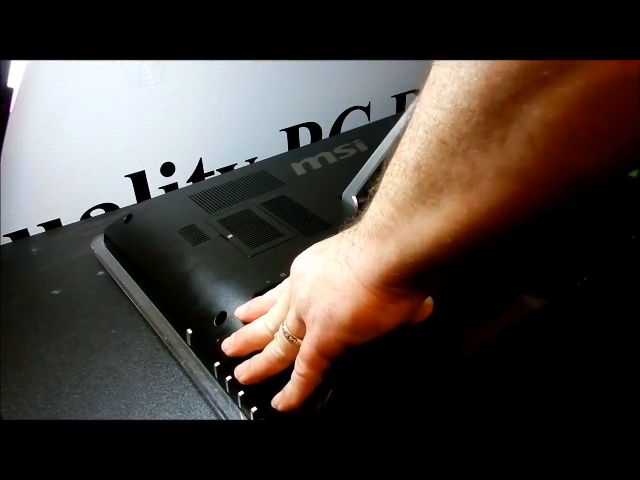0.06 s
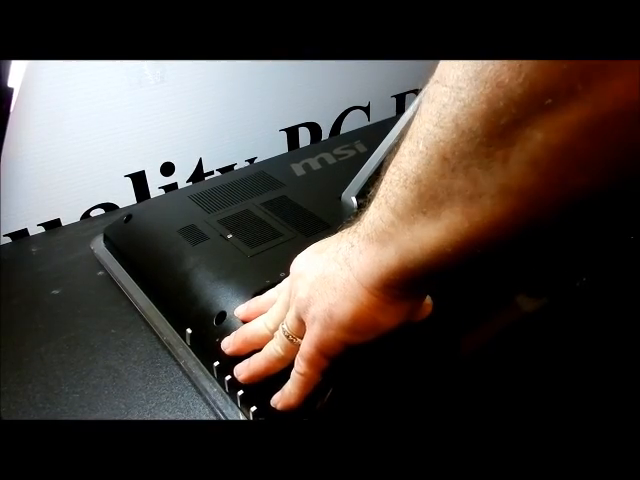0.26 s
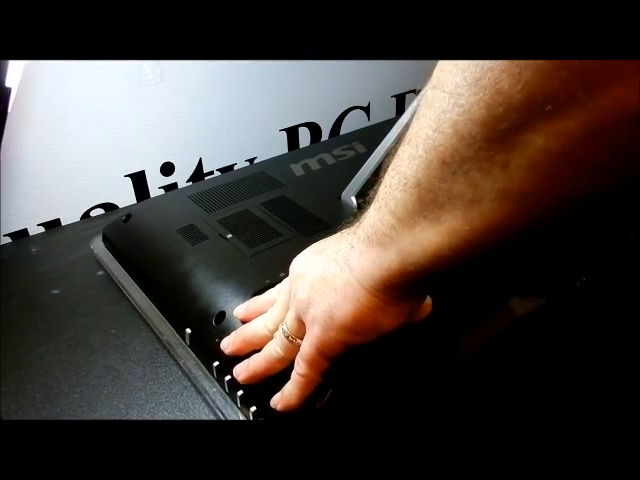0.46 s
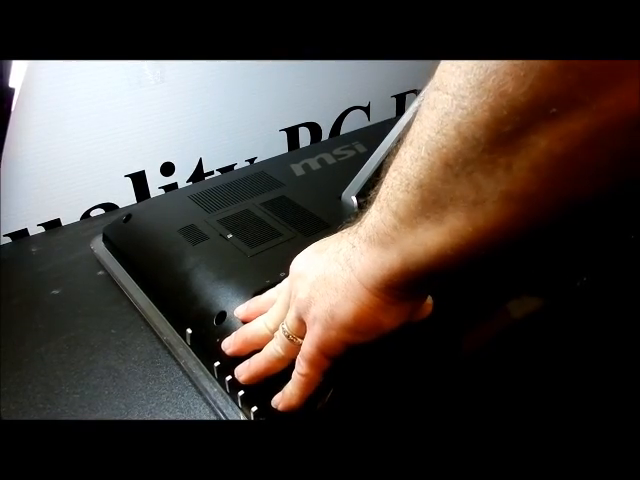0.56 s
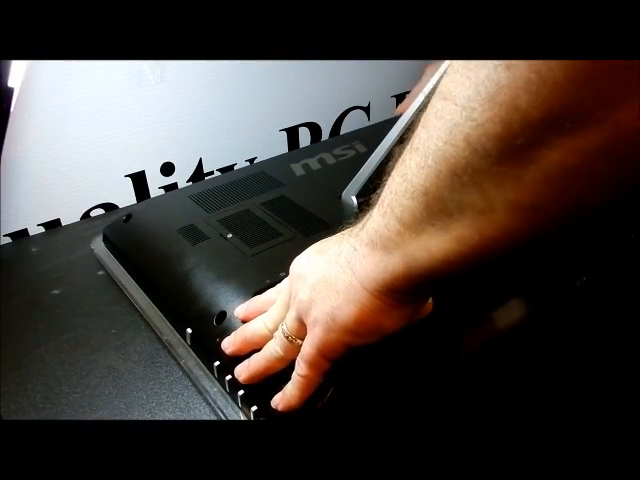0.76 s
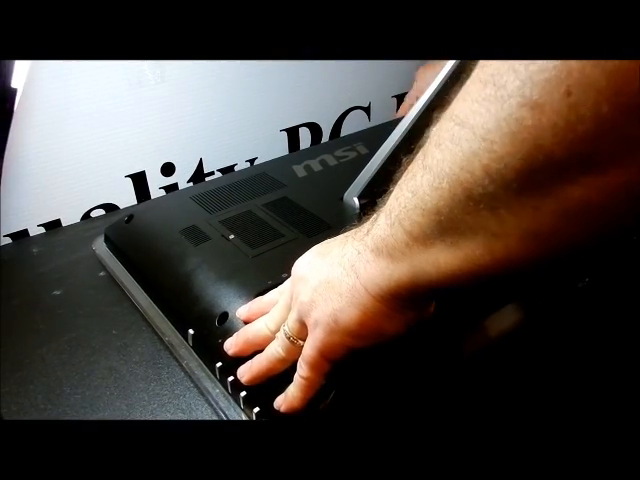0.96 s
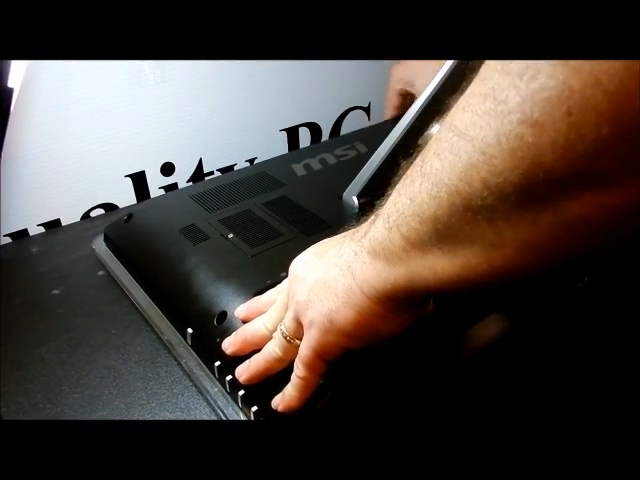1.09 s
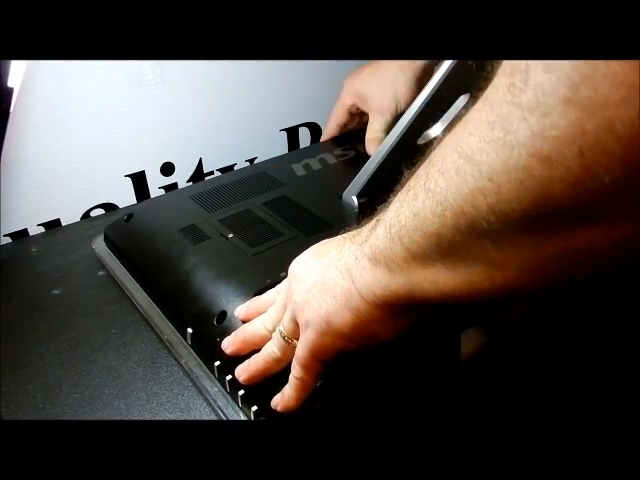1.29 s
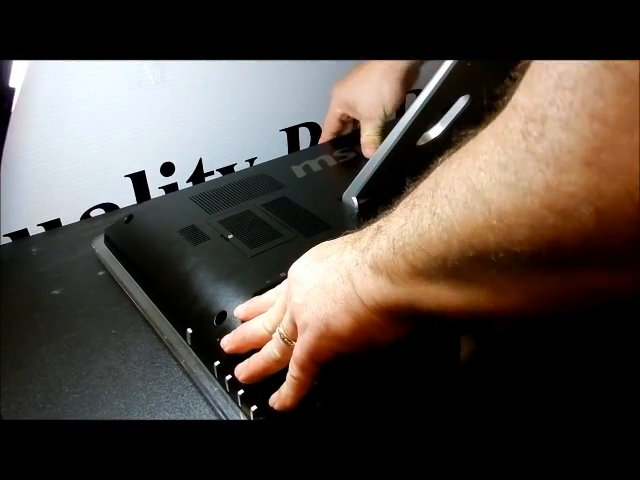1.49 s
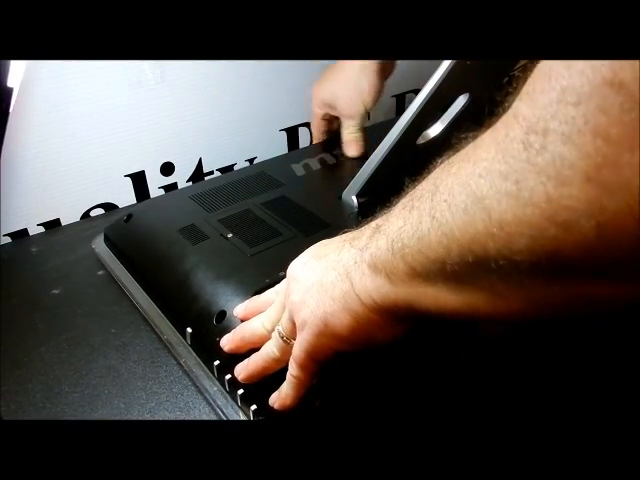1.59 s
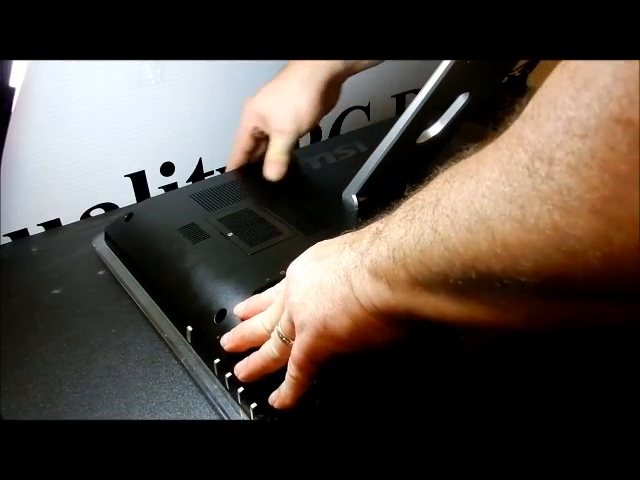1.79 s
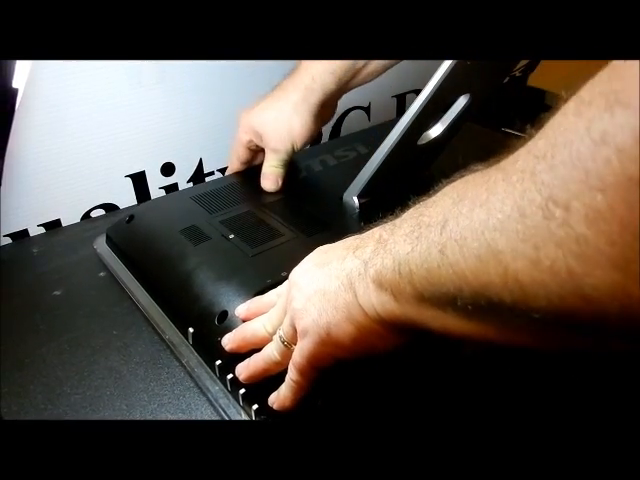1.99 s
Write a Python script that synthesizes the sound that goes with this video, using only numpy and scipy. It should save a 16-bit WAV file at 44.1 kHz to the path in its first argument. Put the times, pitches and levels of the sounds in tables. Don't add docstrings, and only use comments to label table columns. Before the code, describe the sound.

Plastic cover clips snapping home, close up in a small, slightly echoing room. Faint bumps lead to a sharp hollow crack at 0.23 s and a louder, brighter one at 0.41 s, with shell creaking between. It goes nearly quiet over low room hum, with a small knock at 0.81 s. From 1.2 s soft knocks, flexing and skin hiss continue, with a firmer thump at 1.74 s, until about 2 s.

```python
import sys
import numpy as np
from scipy import signal
from scipy.fft import rfft, irfft, next_fast_len
from scipy.io import wavfile
from scipy.ndimage import map_coordinates

SR = 44100
rng = np.random.default_rng(int(sys.argv[2]) if len(sys.argv) > 2 else 0)


def elevation(decibels):
    levels = np.asarray(decibels, float)
    return 10 ** (levels / 20)


def file_out(sig):
    cols = np.atleast_2d(sig).T
    lim = np.clip(cols, -1, 1)
    pcm = np.round(lim * 32767).astype(np.int16)
    wavfile.write(sys.argv[1], SR, pcm)


N = 90404

# pitch in Hz, level in dB, t60 in seconds.
SHELL = [(108, -15, 0.078), (157.9, -6.5, .13), (340, -7, 0.18), (404, -2, 0.18), (433.8, -2.5, 0.065),
         (544.2, 0.5, 0.067), (660, -20.5, 0.066), (775.4, -1.5, 0.086), (850, -13, 0.078),
         (943.5, 0, 0.15), (1150, -14, 0.094), (1492, -9, 0.12), (1833, -18, 0.073), (2500, -12, 0.075)]


def unit(x):
    return x / np.sqrt(np.mean(x ** 2) + 1e-20)


def along(points, hz):
    f, v = np.transpose(points)
    return np.interp(np.log(hz + 1), np.log(f + 1), v)


def curve(rows):
    s, v = np.transpose(rows)
    return np.interp(np.arange(N) / SR, s, v)


def wobble(rate):
    knots = rng.standard_normal(int(N * rate / SR) + 4)
    return map_coordinates(knots, [np.arange(N) * rate / SR])


def filtered(x, response):
    m = next_fast_len(x.shape[-1] + SR // 2)
    spectrum = rfft(x, m) * response(np.fft.rfftfreq(m, 1 / SR))
    return irfft(spectrum, m)[..., :x.shape[-1]]


def peak(f, hz, width):
    return 1j * f * width / (hz * hz - f * f + 1j * f * width)


def spread(two):
    # frequency in Hz, left-right likeness from 0 to 1.
    likeness = [(100, 0.86), (500, 0.86), (3000, 0.53), (12000, .3)]

    def mid_side(hz):
        turn = np.arccos(np.clip(along(likeness, hz), -1, 1)) / 2
        return np.array([np.cos(turn), np.sin(turn)])

    mid, side = filtered(two, mid_side)
    return np.array([mid + side, mid - side])


def pair(spectrum):
    noise = rng.standard_normal((2, N))
    return unit(spread(filtered(noise, lambda hz: elevation(along(spectrum, hz)))))


def shell(f, extra_db, cut_hz):
    body = elevation(-7.5) * peak(f, 700, 1500)
    for k, (hz, db, t60) in enumerate(SHELL):
        width = np.log(1000) / np.pi / t60
        body = body + (-1) ** k * elevation(db + extra_db[k]) * peak(f, hz, width)
    return body / (1 + 1j * f / cut_hz) ** 2


def room(x):
    # frequency in Hz, t60 in seconds.
    decay = [(100, 0.36), (500, 0.33), (2000, 0.29), (8000, 0.24), (15000, .15)]
    level_db, gap_s = -5, .004
    hz, t, z = signal.stft(rng.standard_normal((2, SR // 2)), SR, nperseg=256)
    fading = z * elevation(-60 * t / along(decay, hz)[:, None])
    tail = spread(signal.istft(fading, SR, nperseg=256)[1])
    late = np.pad(x, (round(gap_s * SR), 0))
    wet = signal.fftconvolve(late[None], tail / np.linalg.norm(tail[0]), axes=1)
    return elevation(level_db) * wet[:, :len(x)]


def quiet_room():
    # frequency in Hz, density in dB per Hz.
    air = [(15, -42), (25, 4.5), (471, 2), (1630, -3), (2710, -8.5), (3850, -29.5), (4180, -16.5),
           (4780, -13), (15600, -32)]
    return elevation(-69) * pair(air)


def bench():
    # time in seconds, boom level in dB.
    boom = [(0.0, -46.5), (0.04, -40), (0.2, -53.5), (0.26, -39), (0.39, -46.5), (0.42, -39), (0.75, -80.5),
            (0.85, -44), (0.98, -69), (1.24, -48), (1.27, -48.5), (1.32, -68), (1.54, -47), (1.61, -64),
            (1.65, -43.5), (1.94, -51.5), (1.98, -42.5), (2.05, -50.5)]
    # pitch in Hz, width in Hz, level in dB.
    top_modes = [(74.9, 19, -7), (108, 51, -4), (158.7, 30, -1.5)]
    lumps = rng.standard_normal((2, N)) * elevation(2.6 * wobble(30))

    def top(f):
        return sum((-1) ** k * elevation(db) * peak(f, hz, w) for k, (hz, w, db) in enumerate(top_modes))

    return unit(spread(filtered(lumps, top))) * elevation(curve(boom))


def hand():
    # time in seconds, level in dB.
    creep = [
        (0.0, -61.5),
        (0.22, -56.5),
        (0.39, -49),
        (0.59, -63.5),
        (0.75, -81.5),
        (1.04, -74.5),
        (1.2, -54.5),
        (1.38, -50.5),
        (1.53, -55.5),
        (2.05, -54),
    ]
    # time in seconds, level in dB.
    weight = [(0.0, -73), (0.26, -39), (0.39, -32), (0.46, -39), (0.6, -77), (0.66, -85.5), (0.87, -67.5),
              (1.0, -56.5), (1.39, -50), (1.53, -52), (1.68, -44.5), (1.9, -44.5), (2.05, -45)]
    # frequency in Hz, density in dB per Hz.
    skin = [(1290, -34), (2200, -6), (3370, -8), (5740, -4.5), (8450, -5), (10200, -4), (11300, -2),
            (15600, -6.5)]
    # start in seconds, length in seconds, level in dB.
    stroke_rows = [(0.671, 0.054, -71), (0.898, 0.057, -80.5), (0.983, 0.12, -65.5), (1.085, 0.072, -63),
                   (1.188, 0.11, -51.5), (1.287, 0.099, -74), (1.469, .07, -58), (1.664, 0.15, -54.5),
                   (1.739, 0.052, -45.5), (1.815, 0.081, -47.5), (1.872, 0.091, -46)]
    t = np.arange(N) / SR
    strokes = 0
    for s, length, db in stroke_rows:
        strokes = strokes + elevation(db) * np.sin(np.pi * np.clip((t - s) / length, 0, 1)) ** 0.94
    grain = elevation(1.5 * wobble(25) + 1.2 * wobble(150))
    hiss = pair(skin) * (elevation(curve(creep)) + strokes) * grain
    lumps = rng.standard_normal((2, N)) * elevation(4 * wobble(39) + 4.8 * wobble(200))
    stir = unit(spread(filtered(lumps, lambda f: shell(f, np.zeros(len(SHELL)), 800))))
    return hiss + stir * elevation(curve(weight))


def knocks():
    # start in
    # seconds, level in dB, favoured pitch in Hz, length of the push in seconds, hardness as contact cut-off in
    # Hz.
    knock_rows = [(.003, -37.5, 477, 0.0032, 590), (0.033, -35.5, 383, .012, 650),
                  (0.082, -34.5, 414, .01, 900), (0.233, -13, 1735, 0.0024, 3240),
                  (0.2484, -16.5, 451, .006, 880), (0.353, -30.5, 420, .012, 670),
                  (0.4118, -11, 1355, .004, 2500), (.423, -18.5, 521.4, .009, 1190),
                  (.585, -50, 400, .01, 700), (0.62, -62.5, 404, .01, 697),
                  (0.812, -29.5, 465.5, 0.004, 1880), (0.977, -75.5, 406, .01, 700),
                  (1.029, -38, 394.5, .008, 1800), (1.166, -40.5, 466, .008, 990),
                  (1.205, -34, 850, 0.018, 1430), (1.214, -28, 879, 0.015, 1200),
                  (1.22, -29, 1150, 0.0068, 1200), (1.245, -36.5, 1455, 0.016, 1500),
                  (1.226, -30, 609, 0.016, 900), (1.439, -29.5, 660, 0.0082, 1620),
                  (1.516, -27, 390, 0.0067, 480), (1.622, -30, 516, 0.0041, 1470),
                  (1.647, -35.5, 417, 0.012, 880), (1.728, -33.5, 648, 0.0037, 2000),
                  (1.741, -20, 510, 0.013, 1670), (1.756, -27, 560, 0.0033, 1040),
                  (1.79, -38.5, 420, 0.0073, 800), (1.858, -31, 383.7, 0.021, 804),
                  (1.906, -34, 340, 0.022, 576), (1.955, -42.5, 389, 0.018, 900),
                  (1.984, -27, 550, 0.0062, 1200), (2.028, -45.5, 408, .008, 700)]
    rise_s, scatter_db = .0008, 2
    favour_db, favour_q = 5.5, 2.65
    flex_db, flex_lasts, flex_drift = -4.5, 2.68, 0.051
    out = np.zeros((2, N + SR))
    t = np.arange(SR // 2) / SR
    for s, db, pitch, length, cut in knock_rows:
        force = rng.standard_normal(len(t)) * (1 - np.exp(-t / rise_s)) * np.exp(-t / length)
        extra = scatter_db * rng.standard_normal(len(SHELL))

        def struck(f):
            favoured = 1 + elevation(favour_db) * peak(f, pitch, pitch / favour_q)
            return shell(f, extra, cut) * favoured

        ring = filtered(force, struck)
        turns = np.cumsum(pitch * (1 + flex_drift * wobble(250)[:len(t)])) / SR
        bend = np.sin(np.pi * np.clip(t / (flex_lasts * length), 0, 1) ** 0.71)
        flex = np.sin(2 * np.pi * turns) * bend
        knock = elevation(db) * (ring / np.abs(ring).max() + elevation(flex_db) * flex)
        out[:, round(s * SR):][:, :len(t)] += knock + room(knock)
    return out[:, :N]


def cracks():
    # time of release in seconds, level in dB, centre in Hz, t60 in seconds,
    # slip before it in dB.
    crack_rows = [(.2336, -19.5, 7400, 0.091, -13), (0.2347, -12.5, 2444, 0.033, -13.5),
                  (.4127, -8, 8500, 0.043, -19), (.811, -60, 2950, 0.013, -40),
                  (1.027, -48.5, 4500, .03, -10.5), (1.434, -49, 10000, 0.0086, -16.5),
                  (1.4526, -39.5, 6000, 0.024, -11), (1.4896, -33.5, 11630, .012, -24.5),
                  (1.673, -75.5, 8000, 0.022, -30), (1.74, -35, 7000, 0.1, -12.5),
                  (2.045, -41, 2500, .03, -14)]
    q, q_low = 0.65, .9
    spike_db, spike_t60 = 4.5, 0.0071
    slip_s, rise_s, side_gain = 0.029, 0.00039, .5
    lead = SR // 20
    out = np.zeros((2, N + SR))
    t = (np.arange(SR // 2) - lead) / SR
    for s, db, hz, t60, slip_db in crack_rows:
        slip = elevation(slip_db) * np.clip(1 + t / slip_s, 0, 1) ** 0.74
        rattle = elevation(-60 * np.abs(t) / t60)
        spike = elevation(spike_db - 60 * np.abs(t) / spike_t60)
        snap = (rattle + spike) * np.clip(t / rise_s, .2, 1)
        force = rng.standard_normal((2, len(t))) * np.where(t < 0, slip, snap)
        width = hz / q * (hz / 8000) ** q_low
        mid, side = elevation(db) * filtered(force, lambda f: peak(f, hz, width) * peak(f, hz, 2 * hz))
        crack = mid + side_gain * side * [[1], [-1]]
        out[:, round(s * SR) - lead:][:, :len(t)] += crack + room(mid)
    return out[:, :N]


def scene():
    left_db = -.7
    mix = quiet_room() + bench() + hand() + knocks() + cracks()
    return mix * elevation([[left_db / 2], [-left_db / 2]])


def top_cut(x):
    return signal.sosfilt(signal.butter(12, 15780, fs=SR, output="sos"), x)


def record(dry):
    low_cut_hz, dull_hz, top_hz, ceiling = 55, 11970, 15800, 0.45

    def microphone(f):
        bass = (1j * f / (low_cut_hz + 1j * f)) ** 2
        treble = (f < top_hz) / (1 + (f / dull_hz) ** 4) ** .5
        return bass * treble

    x = filtered(dry, microphone)
    return top_cut(ceiling * np.tanh(x / ceiling))


dry = scene()
out = record(dry)
file_out(out)
```